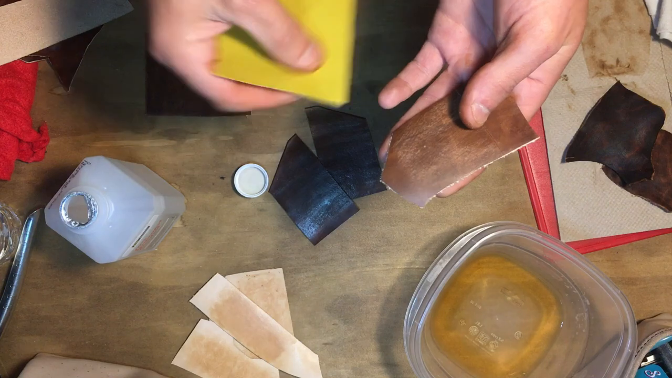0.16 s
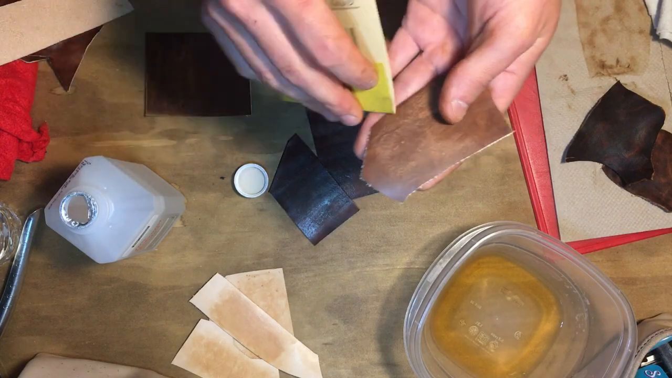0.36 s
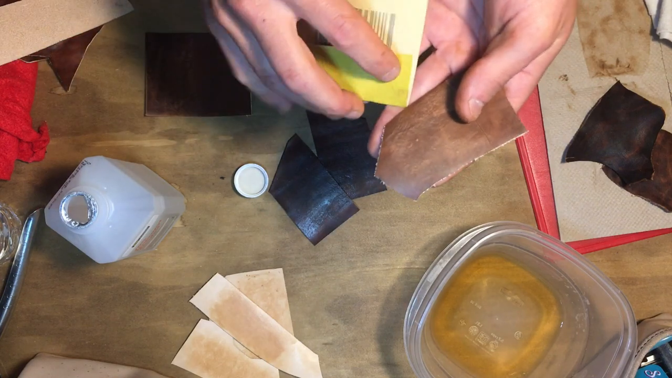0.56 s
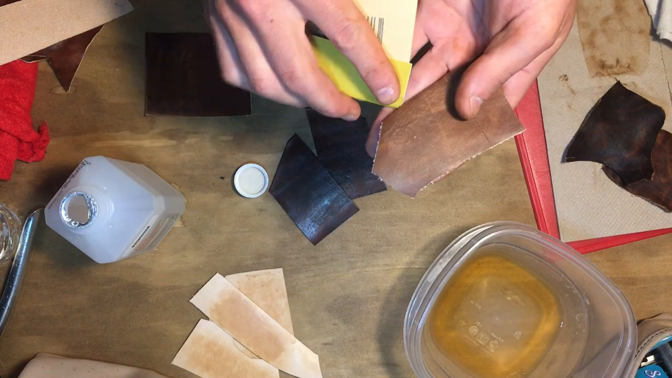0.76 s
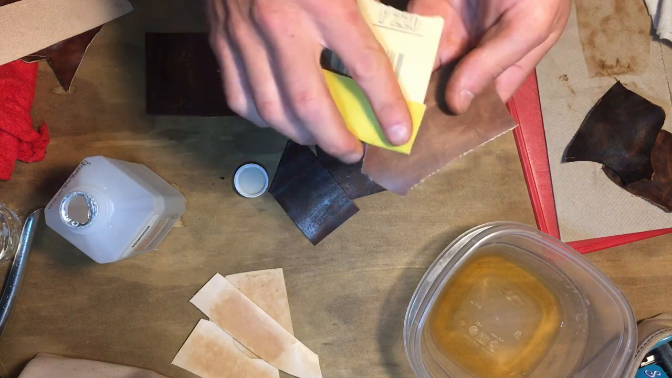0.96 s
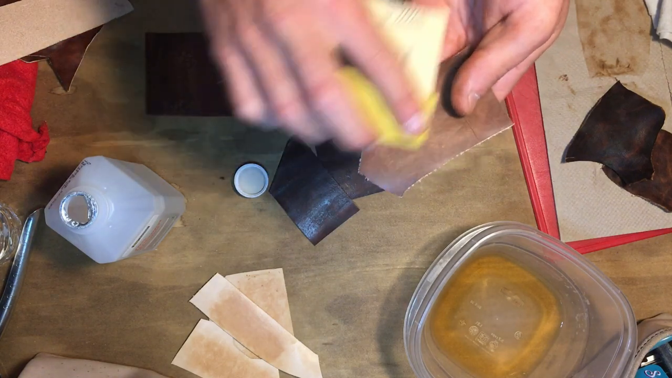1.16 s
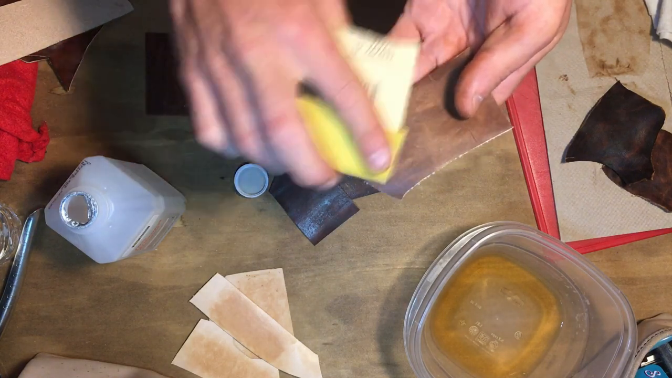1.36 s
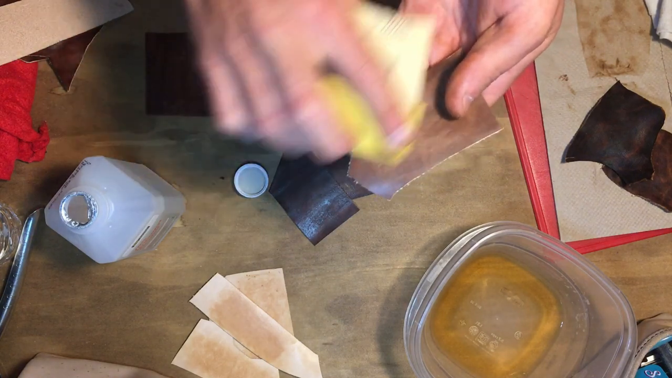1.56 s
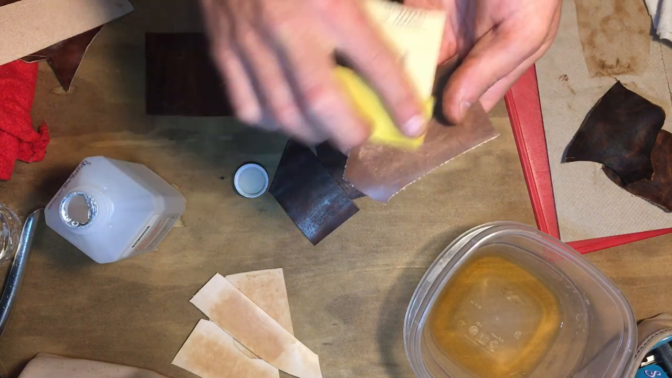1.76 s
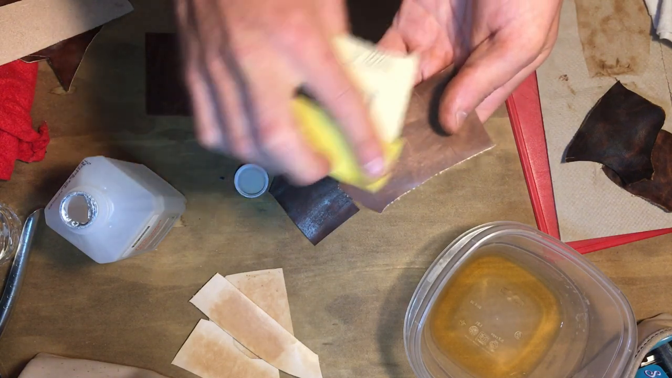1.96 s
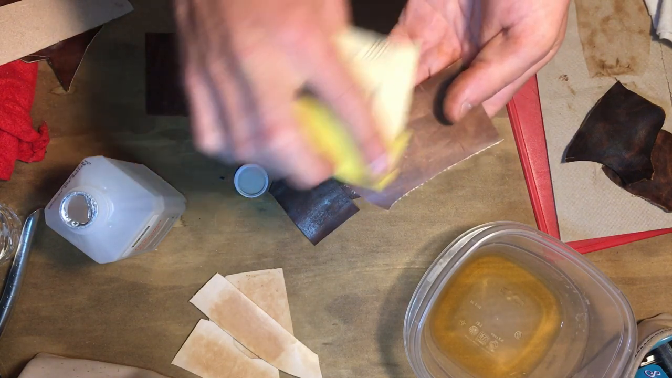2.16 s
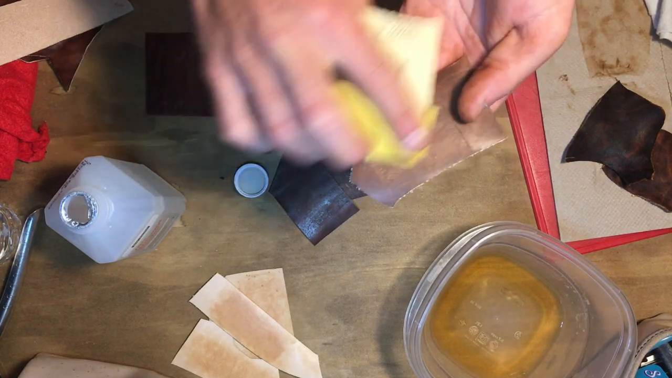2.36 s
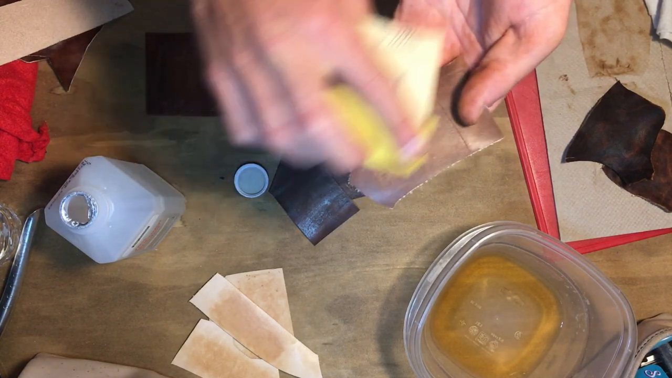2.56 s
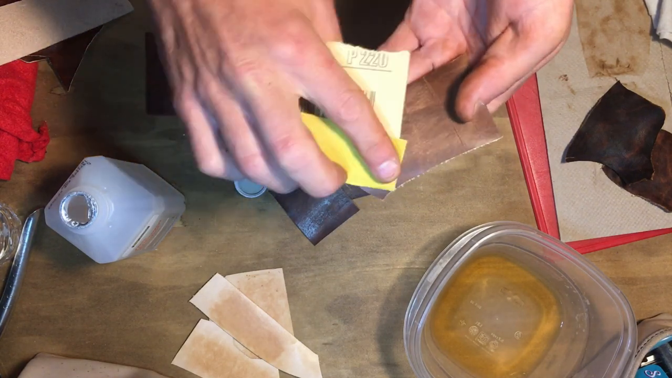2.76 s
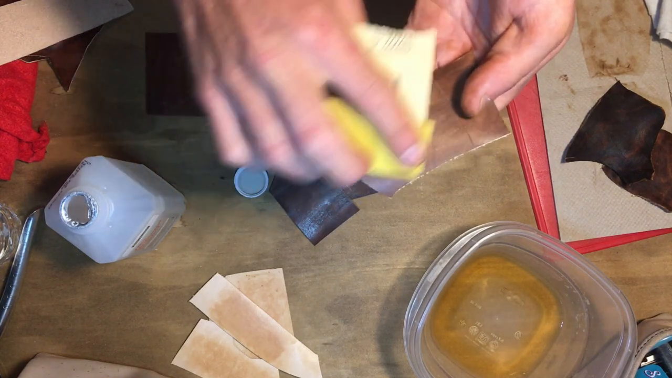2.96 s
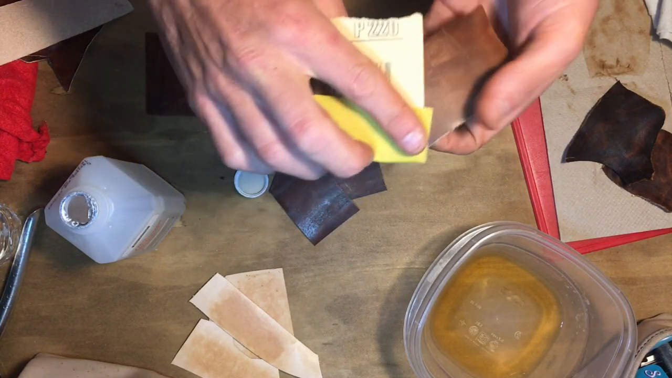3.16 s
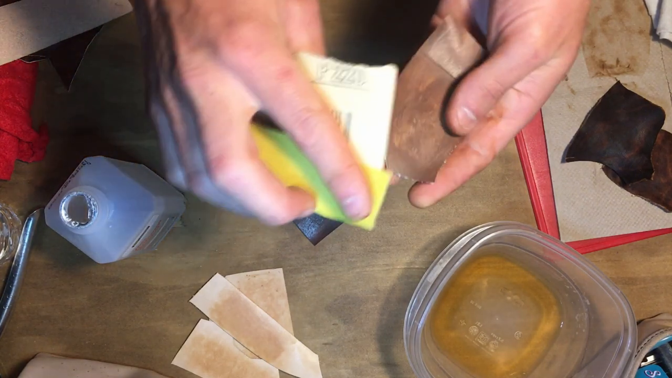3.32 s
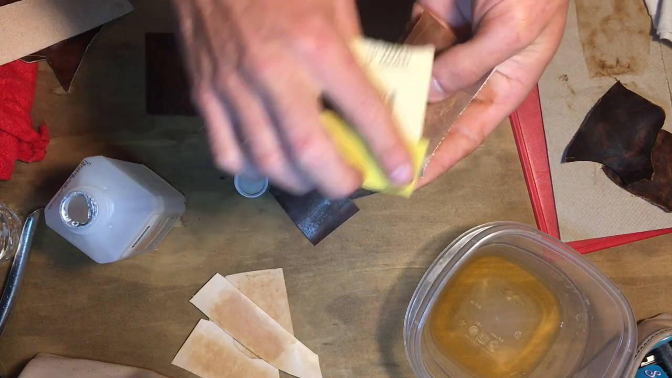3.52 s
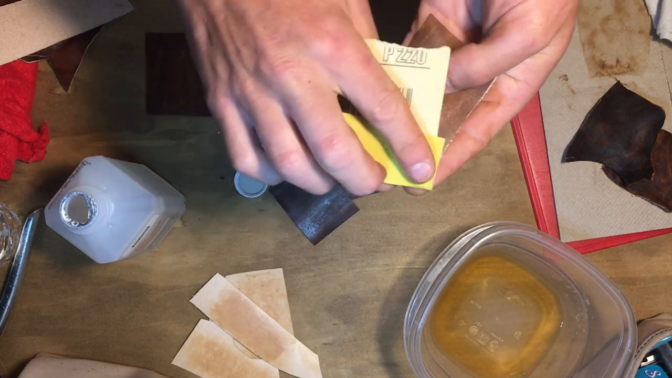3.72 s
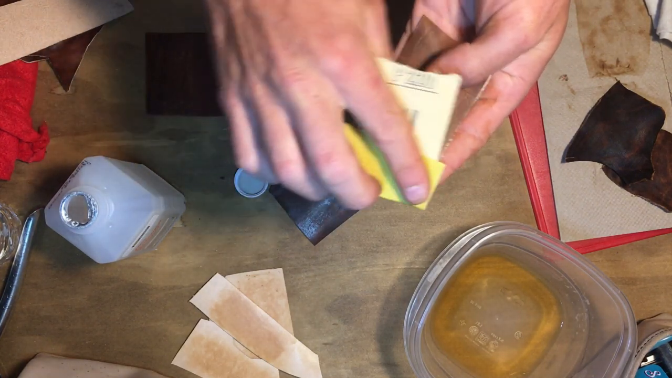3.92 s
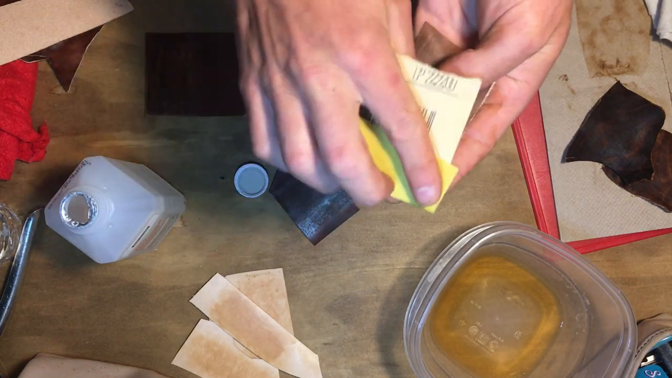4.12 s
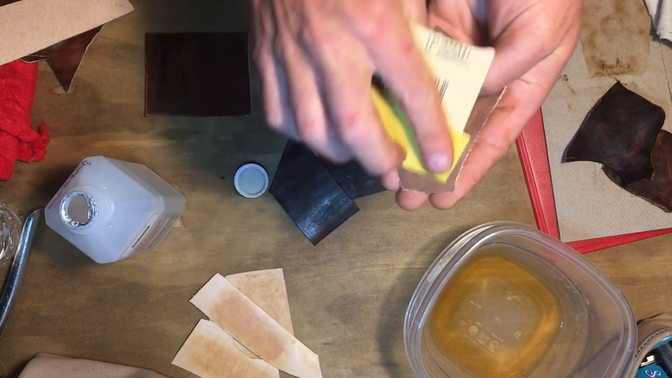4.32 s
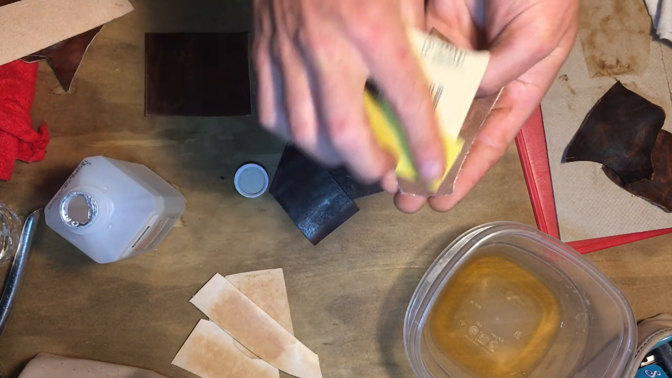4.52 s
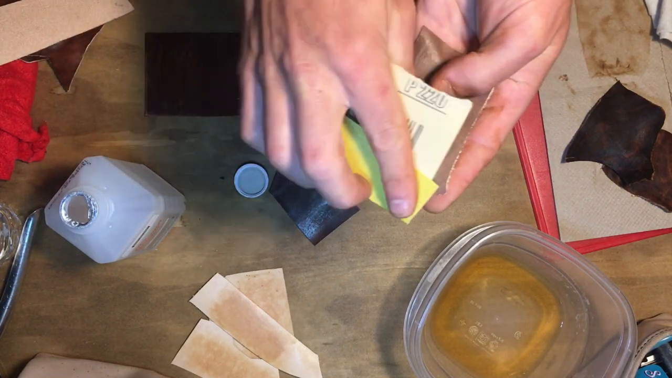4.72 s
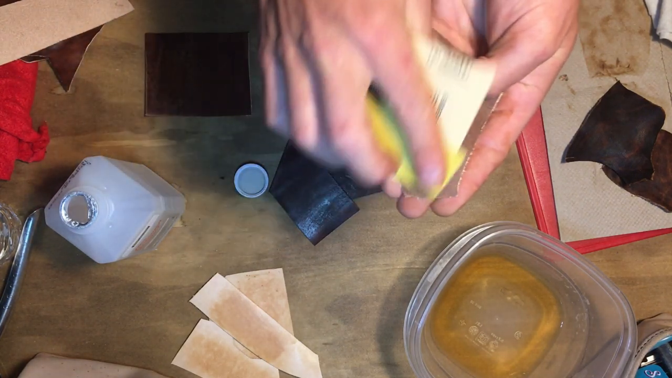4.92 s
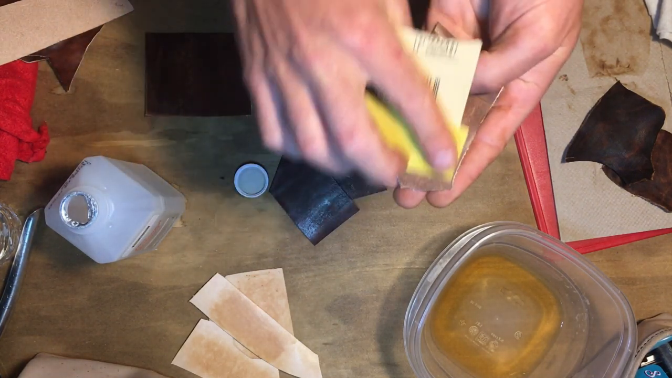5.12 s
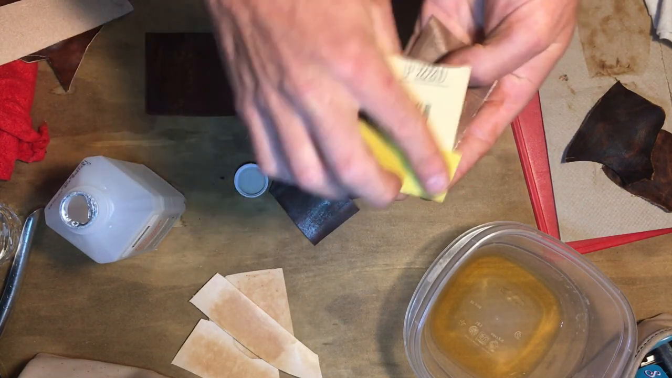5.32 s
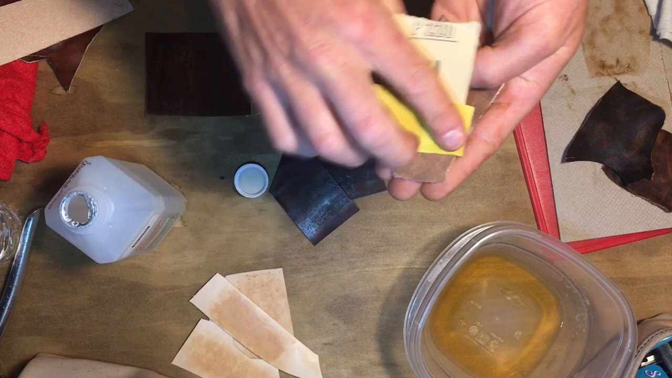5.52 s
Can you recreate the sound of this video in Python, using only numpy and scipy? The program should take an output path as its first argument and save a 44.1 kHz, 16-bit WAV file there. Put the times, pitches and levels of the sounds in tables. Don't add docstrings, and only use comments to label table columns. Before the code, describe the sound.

Close up at a workbench in a quiet room, fingers fold and shift stiff sandpaper with creaks, ticks and soft scuffs. Then fast, even strokes rub over leather, each a short dry hiss. After a brief pause with a few touches and faint bumps, the rubbing resumes with the leather held in the palm, a little slower and less even. A small camera microphone adds low rumble and faint hiss.

```python
import sys
import numpy as np
from scipy import signal
from scipy.fft import rfft, irfft, next_fast_len
from scipy.io import wavfile
from scipy.ndimage import uniform_filter1d

SR = 44100
rng = np.random.default_rng(int(sys.argv[2]) if len(sys.argv) > 2 else 0)


def amp(db):
    return 10 ** (np.asarray(db, float) / 20)


def write(x):
    x = np.atleast_2d(x).T
    wavfile.write(sys.argv[1], SR, np.round(np.clip(x, -1, 1) * 32767).astype(np.int16))


N = 250488

# start in seconds, speeding up in ms, slowing down in ms, level in dB, bite of the grit in dB.
FOLDING = [(0.0, 6.6, 106, -50.5, -5.5), (.055, 16, 52, -50, -1.5), (.118, 28, 35, -58, -6),
           (.183, 41, 19, -62, -11), (.232, 6.6, 20, -61, -4), (.252, 11, 28, -57.5, -2),
           (.372, 17, 20, -45.5, -2.5), (.405, 24, 22, -48, -3.5), (.444, 6, 7, -43.5, -3),
           (.459, 6.3, 18, -40, -5), (.488, 28, 8.8, -48.5, -3), (.532, 8, 9.6, -50, -17),
           (.551, 13, 25, -46, -6), (.583, 16, 60, -47.5, -5.5), (.648, 4.2, 12, -41, -1),
           (.662, 7.7, 22, -45, 2.5), (.714, 5.5, 8.4, -63, -6), (.728, 17, 26, -68, 1),
           (.849, 5.6, 9.8, -39.5, -7.5)]
PAPER_TOUCHES = [(.8, 75, 24, -53.5, -7), (.862, 7, 16, -44.5, -17), (.921, 5, 24, -56.5, 0),
                 (.945, 3.8, 7.7, -55, 1), (.998, 10, 12, -48, -10), (1.014, 10, 14, -47, -6),
                 (3.062, 25, 22, -55, -4), (3.096, 30, 37, -57.5, -6), (3.195, 22, 29, -59, -7),
                 (3.284, 12, 7.7, -40.5, -8), (3.298, 7, 8.6, -37, -7), (3.312, 5, 22, -59, -8),
                 (3.484, 8, 18, -56, -11), (3.512, 6.8, 8, -71, -8), (3.545, 18, 8, -62, -3),
                 (1.055, 17, 8, -62, -3), (.963, 8, 30, -68, -6)]
# start in seconds, length in ms, level in dB, bite of the grit in dB.
BENCH_PUSHES = [(1.073, 43, -34, -4), (1.185, 47, -32, -2), (1.31, 48, -31.5, 0.5),
                (1.433, 48.5, -32, -0.6), (1.552, 46.4, -32, 1), (1.667, 45.6, -31.5, 0),
                (1.783, 49, -32.5, -1), (1.896, 46.7, -33.5, 1.5), (2.011, 45.6, -33.5, 0),
                (2.124, 45.7, -33.5, -.4), (2.239, 48.4, -33.5, -0.5), (2.361, 44.3, -30.5, 0.5),
                (2.476, 45.6, -31, -1.5), (2.597, 49, -33, 0.3), (2.711, 47.7, -33.5, 1.5),
                (2.825, 47.2, -35.5, 0), (2.944, 47, -35, -1)]
BENCH_PULLS = [(1.126, 45, -30.5, -1), (1.247, 50.7, -32, 0), (1.371, 47, -32, 1), (1.493, 46.8, -32, 1),
               (1.609, 46, -32.5, 0.5), (1.723, 47.4, -33, 1.5), (1.84, 45, -34, 2),
               (1.952, 46.7, -33.5, 2), (2.068, 46.4, -33, 0), (2.181, 44, -31.5, 0.2),
               (2.303, 46.4, -32, -0.5), (2.418, 44.3, -32, 0), (2.539, 44.4, -32.5, -0.5),
               (2.657, 47, -34, 1), (2.769, 43.7, -34, -1), (2.885, 47.3, -32, -1.5),
               (3.003, 41.7, -34, -3)]
PALM_STROKES = [(3.565, 45.6, -35, -6.5), (3.623, 50.3, -28, -3.5), (3.684, 59.6, -31.5, -3.5),
                (3.817, 49.3, -41.5, -2), (3.914, 55, -36, -4.5), (3.998, 70, -35, -3.5),
                (4.098, 60, -33, -6.5), (4.19, 58.3, -34.5, -4.5), (4.268, 57, -33, -6),
                (4.35, 51.5, -33, -5), (4.422, 58, -32.5, -5), (4.5, 59.4, -34, -5),
                (4.582, 53.3, -35, -6.5), (4.657, 53, -36, -4.5), (4.728, 53, -34, -4.5),
                (4.801, 55, -34, -4), (4.879, 55, -34, -6), (4.956, 53, -35, -4.5), (5.029, 57, -31, -6),
                (5.1, 62, -31.5, -6.5), (5.187, 45, -33, -7.5), (5.252, 54, -33.5, -5.5),
                (5.326, 45, -30, -4.5), (5.39, 52, -35.5, -3.5), (5.466, 46.7, -32.5, -4.5),
                (5.53, 47.6, -31.5, -3.5), (5.595, 46.4, -31, -3.5), (5.662, 45, -33.5, -3.5)]

PUSH_PRESS_DB = [-0.032, 0.044, -.6, 0.22, -1.5, 0.62, -0.98, 1.2, 0.74, 0.035, -.1, 0.094, .1, 1.7, 0.58,
                 1.1, 1.3]
PULL_PRESS_DB = [-1.4, -0.44, -.2, -.6, -0.78, -0.78, -0.16, .3, -0.5, -1, 0.24, 0.85, 1, 1, 1, -1.5, 0.74]
PALM_PRESS_DB = [-2, -2.5, 1, -1.5, 3, 2.5, -0.2, -1.5, -0.5, -1.5, -0.5, 0.7, -1.2, -1.8, 0, -4, -0.2, -1,
                 -2.7, -2.5, -4, -2.5, -2.5, 0, -0.5, -0.7, -1.5, 2.5]
PUSH_SLANT_DB = [2, -2, 2, .3, -2, -3, -3, 1, -3, -1, -4, 0, -1, -7, -6, -.3, 0]
PULL_SLANT_DB = [-.3, .3, .3, -.6, -1.5, -.6, -.3, .3, -.3, .6, 1.5, .6, -.3, .3, -.3, -.6, .6]
PALM_SLANT_DB = [2.5, -8, -8, 6, -3.5, 0, -2.5, -0.5, -2, 2, -5, -.3, -1, 1, .6, 4, 2, 3, -1, -4, 3, 2, 2,
                 4, -2, 5, -.3, 4]
PALM_DOME_DB = [.6, 4, 3.6, .3, 1.5, 1.3, .3, .3, .3, .6, .3, 1.2, .3, .3, .3, .3, .3, .3, .3, 2.5, .3, .3,
                1.5, .3, .6, .3, .6, .3]
# dull zone at start, dull zone at end, middle zone at start, middle zone at end, all in dB.
PUSH_LEAN_DB = (-1.3, 1.4, -1.2, -0.87)
PULL_LEAN_DB = (.4, -0.34, 0.55, -0.25)
PALM_PUSH_LEAN_DB = (-7, -0.4, 3.5, 2)
PALM_PULL_LEAN_DB = (-1.7, -2.8, 2.2, 1.7)

# frequency in Hz, level in dB per Hz.
HANDLING_COLOUR = [(280, -34), (520, -14.5), (712, -17), (940, -8.5), (1190, -9), (2430, 0.5), (2980, -2),
                   (4060, -4.5), (7610, -22), (11300, -19), (15800, -31)]
BENCH_COLOUR = [(280, -45), (480, -55), (692, -38), (801, -20.5), (1300, -10.5), (1820, -11.5),
                (1950, -5.5), (2400, -1.5), (4000, -1.5), (4980, -5), (9070, -6), (12300, -11),
                (15800, -20.5)]
PALM_COLOUR = [(280, -71), (480, -25.5), (1070, -6.5), (1340, -7), (1660, -9.5), (2010, -2.5), (3120, -5),
               (4360, -7), (4830, -9.5), (8430, -8.5), (10300, -11), (12500, -13.5), (15800, -22.5)]
# centre in Hz, width in Hz, gain in dB.
BENCH_GRIP = [
    (1300, 70, 1.5),
    (2370, 50, -0.5),
    (2474, 52, 4.5),
    (2550, 50, -2.5),
    (3200, 63, 1.5),
    (3340, 58, -6),
    (3930, 89, 1.5),
    (4760, 80, -1),
    (5300, 58, -9),
]
PALM_GRIP = [
    (2117, 87, 6),
    (2210, 66, -1),
    (2310, 61, 5.5),
    (2380, 73, 2.5),
    (2700, 54, 3.5),
    (3570, 60, -4.5),
    (4300, 120, 2.5),
    (4700, 99, 0.5),
    (4960, 81, 2),
    (5330, 98, 5),
]
# centre in Hz, width in Hz, gain in dB.
HOUSING_BANDS = [(725, 24, -10), (1312, 75, 4), (1827, 270, -3.5), (2000, 193, 5), (2108, 54, -12),
                 (2416, 92, 3.5), (2490, 83, -1.5), (2965, 68, -1.5), (3220, 89, 1.5), (3350, 31, -2),
                 (4020, 100, 2.5), (4940, 93, -10), (6900, 130, 1), (825, 340, 5.5), (5440, 100, -1),
                 (10260, 740, -7.5), (11400, 760, -0.5)]

# time in seconds, level in dB.
CONTACT = [(0.0, -49), (.176, -72), (.336, -68), (.416, -59), (.658, -58), (.93, -61.5), (1.12, -64),
           (1.28, -46.5), (1.6, -50.5), (2.19, -51.5), (2.64, -47.5), (3.0, -60), (3.26, -64),
           (3.55, -62.5), (3.8, -65), (3.96, -52), (4.38, -57), (5.68, -52)]
# start in seconds, length in ms, level in dB, pitch in Hz.
PAPER_CREAKS = [(0.018, 9, -52, 1650), (.08, 200, -82, 560), (.107, 9.3, -52, 4300), (.36, 45, -77, 6900),
                (.37, 25, -61, 2600), (.378, 11.4, -58, 5470), (.382, 8.4, -50.5, 4180),
                (.41, 60, -63, 2450), (.41, 73, -65, 1030), (.44, 81, -69, 6900), (.448, 6.8, -57, 4300),
                (0.449, 5.2, -46, 2380), (.465, 25, -52.5, 3280), (.47, 36, -62, 1020),
                (.54, 110, -65, 3300), (.56, 45, -76, 6800), (.565, 8.4, -53, 2100), (0.556, 56, -63, 1010),
                (.651, 9, -54, 6860), (0.651, 12, -56, 1040), (.66, 25, -60, 5500), (.7, 100, -69.5, 5400),
                (.73, 34, -71, 3900), (.775, 84, -74, 2100), (.851, 10, -46.5, 2000), (.852, 9, -61, 7000),
                (.863, 24, -49.5, 2230), (.864, 17.5, -50.5, 3800), (.89, 40, -75, 4000),
                (.922, 20, -60, 2340), (.945, 22, -59, 2300), (1.004, 11, -62, 7200),
                (1.012, 25, -68, 3940), (1.02, 22, -68, 9000), (3.055, 45, -71, 2100),
                (3.07, 30, -70, 3900), (3.1, 58, -69, 2320), (3.19, 74, -70, 2030), (3.36, 90, -76, 2900),
                (3.37, 79, -80, 4300), (3.43, 62, -79, 3000), (3.5, 54, -73, 3200), (3.64, 26, -59.5, 940),
                (3.7, 22, -68, 900), (.017, 20, -61, 4700), (.215, 13, -69, 3320), (.278, 8.8, -69, 3750),
                (3.835, 25, -72, 920), (.68, 30, -67, 3000)]
# start in seconds, length in ms, level in dB, centre in Hz.
PAPER_TICKS = [(.106, 9.9, -57, 4500), (.235, 8.2, -69, 3480), (.238, 3.4, -64, 1300),
               (.353, 15, -63, 5500), (.018, 8, -59, 1500), (.109, 5, -59, 7000), (.385, 4, -53, 4200),
               (.854, 4.4, -50, 2200), (.867, 5, -51, 3000), (3.305, 6, -50, 2500), (3.49, 4.3, -60, 1500),
               (.464, 4, -53, 3200), (.481, 3.8, -52, 3000), (.515, 7.7, -63, 4020), (.568, 6.1, -64, 4000),
               (.597, 5, -58, 3000), (.648, 4.8, -54, 4800), (.675, 11, -56, 2510), (.714, 13.5, -66, 1500),
               (.823, 13, -64, 3000), (.85, 10, -60, 4500), (.948, 6.6, -70, 6500), (3.055, 55, -69, 6800),
               (3.103, 6, -62, 12000), (3.526, 5.4, -72, 7500), (3.495, 6, -71, 11000),
               (.071, 7, -63, 9000), (.393, 7, -58, 11000), (.511, 10, -57, 3200), (.676, 7.6, -56, 8500),
               (.924, 4, -68, 8000), (1.036, 6, -60, 3200), (.216, 3, -74, 7000), (.143, 11, -65, 4500),
               (3.266, 14, -68, 2600), (.541, 8, -65, 3200), (3.269, 37, -79, 2500),
               (3.489, 13, -61.5, 2180), (3.744, 42, -60.5, 2460), (3.825, 4.2, -41.5, 6200)]
# start in seconds, peak in dB, pitch in Hz, T60 in seconds.
BENCH_BUMPS = [(.07, -51.5, 348, 0.11), (.41, -53, 338, 0.073), (0.653, -48, 378, 0.14),
               (.716, -48.5, 303, 0.044), (0.849, -46.5, 340, 0.1), (0.851, -53, 210, 0.062),
               (1.006, -47.5, 330, 0.087), (1.006, -52, 202, 0.077), (1.075, -35.5, 395, 0.032),
               (1.075, -46, 250, .03), (3.622, -58, 378, .05), (3.642, -50, 355, 0.065),
               (3.643, -59, 200, 0.041), (3.644, -60, 604, 0.045), (3.684, -63, 420, .05),
               (3.821, -57, 407, .08), (3.831, -48.5, 110, 0.086), (3.836, -46.5, 176, 0.062),
               (3.853, -49.5, 340, 0.05), (3.87, -52, 150, 0.073)]
# centre in Hz, width in Hz, level in dB.
BENCH_MODES = [
    (352, 88, 7),
    (396, 52, 1.5),
    (230.3, 48, 1),
]
# frequency in Hz, level in dB per Hz.
ROOM_TONE = [(12, -31), (33, -5.5), (58, -4.5), (90, -6), (123, 0), (153, -7.5), (197, -14.5), (431, -21.5),
             (637, -24), (2880, -40), (15800, -41)]


def unit(x):
    return x / np.sqrt(np.mean(x ** 2))


def loudness(x, ms):
    return np.sqrt(np.abs(uniform_filter1d(x ** 2, int(ms * SR / 1000))))


def walk(rate):
    hold = int(SR / rate)
    levels = rng.standard_normal(N // hold + 1)
    return 1.2 * uniform_filter1d(np.repeat(levels, hold), hold)[:N]


def bins():
    return np.linspace(1, SR / 2, 4097)


def causal(x, db):
    cepstrum = irfft(db * np.log(10) / 20)
    half = len(cepstrum) // 2
    cepstrum[1:half] *= 2
    cepstrum[half + 1:] = 0
    response = irfft(np.exp(rfft(cepstrum)))[:half]
    return signal.fftconvolve(x, response)[:N]


def colour(x, points):
    hz, db = np.transpose(points)
    return causal(x, np.interp(np.log(bins()), np.log(hz), db, left=-60, right=-60))


def narrow(x, bands):
    return causal(x, sum(db / (1 + (2 * (bins() - hz) / width) ** 2) for hz, width, db in bands))


def band(x, lo_hz, hi_hz):
    return signal.sosfilt(signal.butter(3, [lo_hz, hi_hz], "bandpass", fs=SR, output="sos"), x)


def ring(x, hz, width):
    b, a = signal.iirpeak(hz, hz / width, SR)
    return signal.lfilter(b, a, signal.lfilter(b, a, x))


def zones(x):
    dull_top_hz, bright_floor_hz = 2800, 3570
    size = next_fast_len(N)
    hz = np.linspace(1, SR / 2, size // 2 + 1)
    spectrum = rfft(x, size)
    dull = irfft(spectrum / (1 + (hz / dull_top_hz) ** 12), size)[:N]
    bright = irfft(spectrum / (1 + (bright_floor_hz / hz) ** 12), size)[:N]
    return dull, x - dull - bright, bright


def room_tone():
    air = unit(colour(rng.standard_normal(N), ROOM_TONE)) * amp(-68 + 1.3 * walk(3.24))
    hum_hz = 122
    hum = np.sqrt(2) * np.sin(2 * np.pi * hum_hz * np.arange(N) / SR)
    return air + hum * amp(-98 + 2.6 * walk(7.5))


def grit(share, spread_db):
    catch, sign, size = rng.random(N), rng.standard_normal(N), rng.exponential(size=N)
    return unit((catch < share) * sign * amp(spread_db * size))


def rustle():
    rub = colour(grit(share=0.28, spread_db=2.0), PALM_COLOUR)
    dull = unit(band(rub, 450, 4500))
    fine = unit(band(rub, 4500, 17000)) * amp(-3.5 + 2.0 * walk(5.73))
    seconds, db = np.transpose(CONTACT)
    firmness = amp(np.interp(np.arange(N) / SR, seconds, db))
    return (dull + fine) * firmness * amp(-11.0 + 2.0 * walk(30))


def with_body(rows, body_db, db_per_s):
    return [(*row, body_db + db_per_s * (row[0] - rows[0][0])) for row in rows]


def swings(table, rise, body_db, db_per_s):
    rows = [(start, rise * ms, (1 - rise) * ms, db, bite_db) for start, ms, db, bite_db in table]
    return with_body(rows, body_db, db_per_s)


def leaning(rows, leans_db, *habits_db):
    return [(*row, leans_db[k % len(leans_db)], *(habit[k % len(habit)] for habit in habits_db))
            for k, row in enumerate(rows)]


def strokes(table, points, edge_db, fullness, taper, sharpen, patchy_db, share, spread_db, trim_db):
    powers = np.zeros((5, N))
    for start, up_ms, down_ms, db, hiss_db, body_db, lean_db, press_db, slant_db, dome_db in table:
        first = max(int((start - 3 * up_ms / 1000) * SR), 0)
        last = min(int((start + (up_ms + 4 * down_ms) / 1000) * SR), N)
        ms = (np.arange(first, last) / SR - start) * 1000 - up_ms
        off_middle = np.where(ms < 0, -ms / up_ms, ms / down_ms)
        slowing_db = edge_db * off_middle ** np.where(ms < 0, fullness, taper)
        reach = np.clip((ms + up_ms) / (up_ms + down_ms), 0, 1)
        dull_start, dull_end, middle_start, middle_end = lean_db
        layers_db = (body_db + 0.47 * press_db,
                     dull_start + (dull_end - dull_start) * reach + press_db,
                     middle_start + (middle_end - middle_start) * reach,
                     0,
                     hiss_db + (sharpen - 1) * slowing_db)
        stroke_db = db + slowing_db + slant_db * (reach - .5) - dome_db * (2 * reach - 1) ** 2
        for power, layer_db in zip(powers, layers_db):
            power[first:last] += amp(stroke_db + layer_db) ** 2
    rub = colour(grit(share, spread_db), points)
    body, hiss = unit(band(rub, 450, 1550)), unit(band(rub, 5400, 17000))
    parts = body, *zones(unit(band(rub, 1550, 5400))), hiss
    nap = walk(90)
    body_flicker, scrape_flicker, hiss_flicker = walk(61.5), walk(60), walk(59.7)
    flickers = body_flicker, scrape_flicker, scrape_flicker, scrape_flicker, hiss_flicker
    out = np.zeros(N)
    for power, part, flicker in zip(powers, parts, flickers):
        out += np.sqrt(power) * part * amp(patchy_db * (nap + 0.26 * flicker))
    return amp(trim_db) * out


def handling():
    rows = with_body(FOLDING, body_db=-5.5, db_per_s=0) + with_body(PAPER_TOUCHES, body_db=-8.5, db_per_s=-3)
    rows = leaning(rows, [np.zeros(4)], [0], [0], [0])
    return strokes(rows, HANDLING_COLOUR, edge_db=-9.0, fullness=1.7, taper=2.1, sharpen=1.3,
                   patchy_db=1.55, share=.45, spread_db=1.8, trim_db=-5.0)


def creaks(table, sharpness):
    out, rub = np.zeros(N), grit(share=0.44, spread_db=0.2)
    for start, length_ms, db, hz in table:
        first, count = int(start * SR), int(length_ms * SR / 1000)
        creak = ring(rub[first:first + 2 * count], hz, hz / sharpness)[count:]
        swell = np.sin(np.pi * np.linspace(0, 1, count) ** .5)
        out[first:first + count] += amp(db + 4) * unit(creak) * swell
    return out


def bench_top(bench, palm, hands):
    force = loudness(bench + palm + hands, ms=8.1)
    pulse = force / (uniform_filter1d(force, SR // 8) + 1e-5)
    shake = rng.standard_normal(N) * pulse ** 0.28 * amp(1.9 * walk(22))
    drone = unit(sum(amp(db) * unit(ring(shake, hz, width)) for hz, width, db in BENCH_MODES))
    bench, palm, hands = (band(x, 450, 1550) for x in (bench, palm, hands))
    load = loudness(amp(-12) * bench + amp(-11.5) * palm, ms=120) + amp(-8) * loudness(hands, ms=79)
    tremble_db, tremble_t60_s = -27.5, 0.3
    bumps = np.zeros(N)
    for start, db, hz, t60 in BENCH_BUMPS:
        age = np.clip(np.arange(N) / SR - start, 0, None)
        touch = amp(db) * (1 - np.exp(-age / 0.0032))
        bumps += touch * np.sin(2 * np.pi * hz * age) * amp(-60 * age / t60)
        load = load + touch * amp(tremble_db - 60 * age / tremble_t60_s)
    return bumps + drone * load


def bench_sanding():
    pushes = swings(BENCH_PUSHES, rise=0.56, body_db=-17.5, db_per_s=0.093)
    pulls = swings(BENCH_PULLS, rise=0.52, body_db=-15.5, db_per_s=-3)
    rows = (leaning(pushes, [PUSH_LEAN_DB], PUSH_PRESS_DB, PUSH_SLANT_DB, [.3])
            + leaning(pulls, [PULL_LEAN_DB], PULL_PRESS_DB, PULL_SLANT_DB, [.3]))
    return strokes(rows, BENCH_COLOUR, edge_db=-14.5, fullness=3.86, taper=3.95, sharpen=1.37,
                   patchy_db=-0.2, share=0.95, spread_db=-0.5, trim_db=-4.5)


def palm_sanding():
    regrip_s, regrip_db = 5.52, 5
    rows = swings(PALM_STROKES, rise=0.47, body_db=-17.5, db_per_s=-2.5)
    rows = [(*row[:5], row[5] + regrip_db * (row[0] > regrip_s)) for row in rows]
    rows = leaning(rows, [PALM_PUSH_LEAN_DB, PALM_PULL_LEAN_DB], PALM_PRESS_DB, PALM_SLANT_DB, PALM_DOME_DB)
    return strokes(rows, PALM_COLOUR, edge_db=-12.5, fullness=4.25, taper=3.44, sharpen=1.3,
                   patchy_db=0.0, share=1.0, spread_db=-0.7, trim_db=-4.5)


def hand_echo(x, db, ms, sway_ms):
    late = np.arange(N) - SR / 1000 * (ms + sway_ms * walk(9))
    return x + amp(db) * np.interp(late, np.arange(N), x)


def room(x):
    t60_s, tail_db = .1, -17
    age = np.arange(SR // 2) / SR
    tail = rng.standard_normal(len(age)) * amp(-60 * age / t60_s) * (age > .004)
    return x + amp(tail_db) * signal.fftconvolve(x, tail / np.sqrt(np.sum(tail ** 2)))[:N]


def scene():
    hands, bench, palm = handling(), bench_sanding(), palm_sanding()
    paper = creaks(PAPER_CREAKS, sharpness=3.8) + creaks(PAPER_TICKS, sharpness=0.87)
    rubbing = narrow(bench, BENCH_GRIP) + narrow(palm, PALM_GRIP) + hands + rustle()
    near_hand = hand_echo(rubbing, db=-15.5, ms=0.584, sway_ms=0.091) + paper
    heard = narrow(room(near_hand), HOUSING_BANDS)
    heard = hand_echo(heard, db=-13.5, ms=3.2, sway_ms=0.352)
    return (heard + bench_top(bench, palm, hands + paper) + room_tone())[None]


def band_limit(x):
    return signal.sosfilt(signal.butter(12, 15840, fs=SR, output="sos"), x)


def record(dry):
    top_hz = 15800
    mix = signal.sosfilt(signal.ellip(10, .2, 70, top_hz, fs=SR, output="sos"), dry)
    return band_limit(mix)


dry = scene()
out = record(dry)
write(out)
```